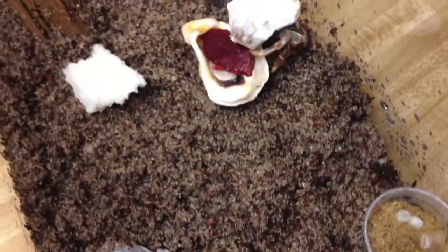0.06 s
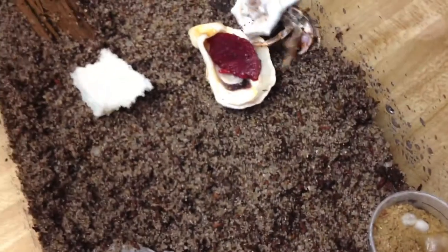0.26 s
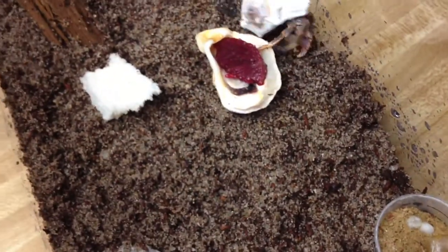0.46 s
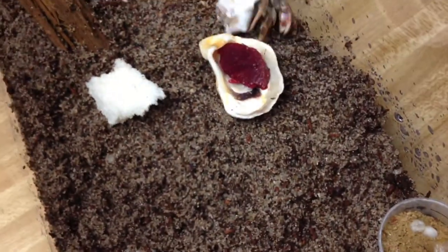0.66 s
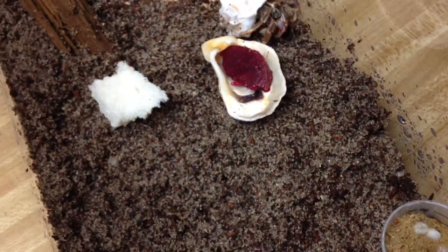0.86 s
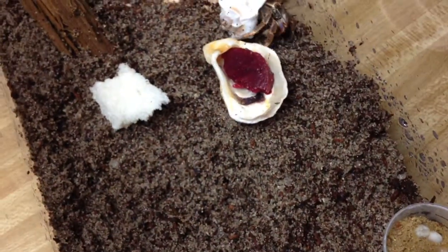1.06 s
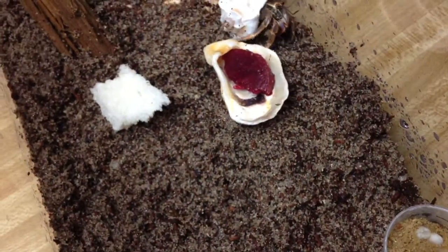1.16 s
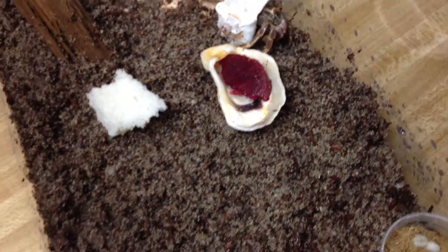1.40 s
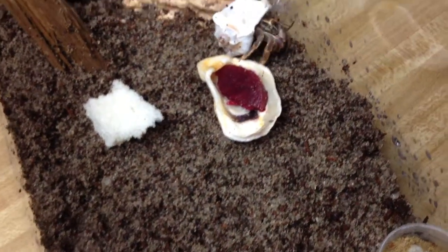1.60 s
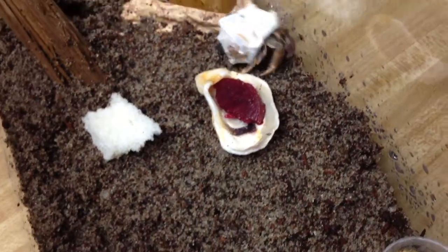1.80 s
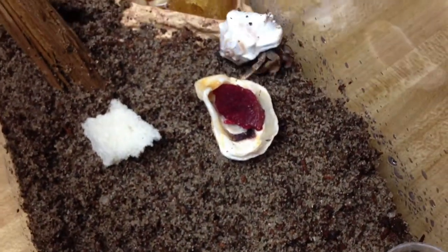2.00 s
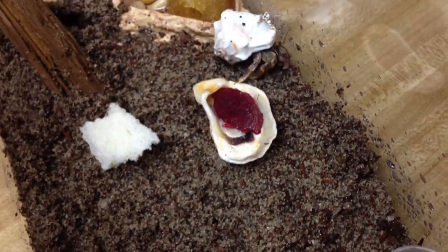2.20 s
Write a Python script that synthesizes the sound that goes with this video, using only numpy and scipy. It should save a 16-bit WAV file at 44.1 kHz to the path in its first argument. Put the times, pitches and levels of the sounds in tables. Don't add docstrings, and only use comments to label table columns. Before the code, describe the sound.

A hermit crab's shell clicks on a small hard dish, then knocks the plastic tank wall; after a quiet gap with tiny ticks and grit scrapes, one last hard knock. Close phone microphone, faint hiss and hum.

```python
import sys
import numpy as np
from scipy import signal
from scipy.fft import rfft, irfft
from scipy.io import wavfile
from scipy.ndimage import uniform_filter1d

SR = 44100
rng = np.random.default_rng(int(sys.argv[2]) if len(sys.argv) > 2 else 0)


def boost(x):
    u = np.asarray(x, float) / 20
    return 10 ** u


def master(y):
    cut = np.clip(np.atleast_2d(y).T, -1, 1)
    pcm = np.round(cut * 32767)
    wavfile.write(sys.argv[1], SR, pcm.astype(np.int16))


N = 99225

# pitch_hz [Hz], level_db [dB per Hz]
NOISE_COLOUR = [(30, -28), (90, -18.5), (150, 4), (250, 13),
                (300, -2.7), (600, -3), (1500, -11), (4000, -15.5), (7000, -17.5), (10000, -23.5),
               (12500, -17.5), (15500, -18.5)]
# pitch_hz [Hz], width_hz [Hz], level_db [dB rms]
DRONE_RESONANCES = [(180, 7.8, -62.5), (236.6, 32, -63), (272, 16, -81.5), (365.2, 79, -69),
                    (466.4, 44, -75.5), (646, 81, -82.5)]
# pitch_hz [Hz], t60_s [s]
TANK_DECAY = [(250, 0.22), (1000, 0.13), (3000, 0.13), (8000, 0.092), (15000, 0.15)]
# start_s [s], length_s [s], level_db [dB rms],
# colour_hz [Hz], spread_oct [octaves], dish_share [0-1, part that rings the dish]
GRIT_SCRAPES = [(.1228, 0.0054, -54.5, 11000, 1, 0), (.128, 0.014, -56, 3930, 1.3, 0),
                (0.141, .012, -66, 3500, 1.1, 0), (0.167, 0.011, -58, 2500, 1.2, 0.26),
                (0.211, 0.014, -62, 10000, 0.53, .9), (0.224, 0.015, -57, 5500, 0.42, .9),
                (0.245, 0.065, -64, 5330, 0.88, 0.84), (0.323, 0.068, -69, 9100, 1, 0.97),
                (0.609, 0.04, -63, 6300, 0.23, 0.68), (0.617, 0.032, -64, 12500, 0.24, 0.64),
                (0.78, 0.026, -80, 7200, 0.18, 1), (0.936, 0.022, -67, 3500, .6, 0.06),
                (1.732, .012, -57, 5700, 0.85, 0), (1.7405, 0.016, -50, 4000, 0.41, 0.6),
                (1.754, 0.024, -60, 3500, 1, 0), (1.827, 0.048, -63.5, 3500, 1.24, 0.02),
                (1.851, 0.03, -51.5, 2200, 0.7, 0.23)]
# start_s [s], peak_db [dB], colour_hz [Hz], spread_oct [octaves]
FAR_WALL_KNOCKS = [
    (1.9478, -21, 1150, 1.5),
]
# pitch_hz [Hz], level_db [dB], t60_s [s]
FAR_WALL_MODES = [(242, -4, 0.018), (445, -3, 0.042), (596, -7, 0.039), (830, 2.8, 0.033),
                  (1100, -8.5, 0.041), (1360, -6, 0.013), (1825, -10.5, 0.031), (2132, -2.5, 0.022),
                  (2810, -9, 0.014), (3530, -13, 0.035), (4300, -23, .022), (5100, -32, 0.01),
                  (7640, -15, .015)]
# start_s [s], peak_db [dB], colour_hz [Hz], spread_oct [octaves]
NEAR_WALL_KNOCKS = [(.4065, -19, 1590, 1.55), (.130, -43.5, 1860, .25), (.151, -46, 2520, 1),
                    (.133, -47.5, 945, .3), (.6012, -50, 1560, 0.62), (.8762, -45, 3150, 0.94),
                    (.8912, -44, 2640, 1.17), (.896, -51, 1100, 0.5), (1.852, -50, 2200, 0.73),
                    (1.8565, -44, 1100, 0.54), (1.8615, -45.5, 1100, 0.23)]
# pitch_hz [Hz], level_db [dB], t60_s [s]
NEAR_WALL_MODES = [(221, 2.5, .08), (300, 3.5, .07), (437, 4.5, 0.054), (630, -2, 0.056), (820, 2, 0.048),
                   (1047.5, -1, 0.044), (1284, -3.5, 0.028), (1800, 0.5, 0.015), (2237, -4, 0.033),
                   (2695, -8, 0.019), (3500, 0, 0.019), (4300, -2, 0.012), (5600, -36, 0.0067),
                   (7200, -12, 0.026)]
# start_s [s], peak_db [dB], colour_hz [Hz], spread_oct [octaves]
DISH_TICKS = [(.1055, -56.5, 11100, 0.11), (.118, -59, 11000, .1), (.2065, -52, 9100, .6),
              (.2135, -49, 3000, 0.77), (.2233, -18.5, 6650, 0.93), (.2275, -32.5, 4840, 0.76),
              (.237, -55, 12000, .2), (.3698, -37, 4300, 0.6), (.381, -42, 4960, 1.1),
              (.3943, -19, 5600, 0.56), (.399, -36, 4200, 0.42), (.592, -58, 9000, .6),
              (.601, -43, 6030, 0.99), (.6305, -50, 11200, 0.41), (.7535, -59, 6000, 0.65),
              (.7715, -47, 7500, 0.65), (1.154, -49, 10700, 0.15), (1.174, -48.5, 11000, 0.3),
              (1.188, -67, 11500, .2)]
# pitch_hz [Hz], level_db [dB], t60_s [s]
DISH_MODES = [(1745, 2, 0.009), (2200, 0.5, 0.0063), (3214, -7.5, 0.0078), (4150, -11.5, 0.015),
              (4600, -7, 0.0054), (5643, -6.7, 0.011), (6440, -1.5, 0.0039), (7200, 1, 0.0047),
              (9140, -27, 0.029), (11100, -13.5, 0.01), (11800, -17, 0.0092), (12240, -12, 0.031),
              (15500, -32, .015)]


def evened(x):
    return x / np.sqrt(np.mean(x ** 2) + 1e-20)


def read_curve(points, hz):
    point_hz, value = np.transpose(points)
    return np.interp(np.log(hz + 1), np.log(point_hz + 1), value)


def add(mix, start_s, sound):
    part = mix[round(start_s * SR):][:len(sound)]
    part += sound[:len(part)]


def highpassed(x, edge_hz):
    return signal.sosfilt(signal.butter(4, edge_hz, "high", fs=SR, output="sos"), x)


def colour_hump(hz, colour_hz, spread_oct):
    octaves = np.log2(np.maximum(hz, 1) / colour_hz)
    return np.exp(-0.5 * (octaves / spread_oct) ** 2)


def tinted(x, colour_hz, spread_oct):
    hz = np.fft.rfftfreq(len(x), 1 / SR)
    return irfft(rfft(x) * colour_hump(hz, colour_hz, spread_oct), len(x))


def ring(modes, colour_hz, spread_oct, split):
    neighbour_db = -8
    t = np.arange(4096) / SR
    hz, level_db, t60_s = np.transpose(modes)[:, :, None]
    sign = (-1.0) ** np.arange(len(modes))[:, None]
    below, above = rng.uniform(0.44, 1, (2, len(modes), 1))
    lower = np.sin(2 * np.pi * hz * (1 - split * below) * t)
    upper = np.sin(2 * np.pi * hz * (1 + split * above) * t)
    cluster = np.sin(2 * np.pi * hz * t) + boost(neighbour_db) * (lower - upper)
    gain = sign * colour_hump(hz, colour_hz, spread_oct)
    return (gain * boost(level_db - 60 * t / t60_s) * cluster).sum(0)


def hits(blows, modes, split, crack_db, crack_t60_s):
    attack_s, bounce_s, bounce_db = 0.00018, 0.0007, -9.5
    out = np.zeros(N)
    t = np.arange(4096) / SR
    for start_s, peak_db, colour_hz, spread_oct in blows:
        body = ring(modes, colour_hz, spread_oct, split)
        crack = evened(tinted(rng.standard_normal(4096), colour_hz, 0.81 * spread_oct))
        crack = crack * boost(crack_db - 60 * t / crack_t60_s)
        blow = boost(peak_db) * (body / np.abs(body).max() + crack) * np.minimum(t / attack_s, 1)
        add(out, start_s, blow)
        add(out, start_s + bounce_s, boost(bounce_db) * blow)
    return out


def hiss():
    level_db, patchy_db = -67.5, 0.5
    hz = np.fft.rfftfreq(1024, 1 / SR)
    real, imag, patches = rng.standard_normal((N // 256 + 5, 513, 3)).T
    patches = uniform_filter1d(uniform_filter1d(patches, 12, 0), 14, 1)
    colour_db = read_curve(NOISE_COLOUR, hz)[:, None]
    spectra = (real + 1j * imag) * boost(colour_db + patchy_db * evened(patches))
    x = signal.istft(spectra, nperseg=1024, noverlap=768)[1][:N]
    return boost(level_db) * x / highpassed(x, 500).std()


def appliance():
    hum_hz, hum_db = 119.8, -76
    t = np.arange(N + SR) / SR
    out = np.sqrt(2) * boost(hum_db) * np.sin(2 * np.pi * hum_hz * t[:N])
    for hz, width_hz, level_db in DRONE_RESONANCES:
        r = np.exp(-np.pi * width_hz / SR)
        real, imag = rng.standard_normal((2, N + SR))
        wander = signal.lfilter([1 - r], [1, -r], real + 1j * imag)
        wander = signal.lfilter([1 - r], [1, -r], wander)
        drone = (wander * np.exp(2j * np.pi * hz * t)).real[SR:]
        out = out + boost(level_db) * evened(drone)
    return out


def tank_reflections(x):
    build_up_s = 0.0032
    hz, t, z = signal.stft(rng.standard_normal(SR // 2), SR, nperseg=128)
    decay = boost(-60 * t / read_curve(TANK_DECAY, hz)[:, None])
    tail = signal.istft(z * decay, SR, nperseg=128)[1]
    tail = tail * np.clip(np.arange(len(tail)) / SR / build_up_s, 0, 1)
    return signal.fftconvolve(x, tail / np.linalg.norm(tail))[:N]


def grit_scrapes():
    grits_per_s, grit_spread_db = 9000, 1.6
    out = np.zeros(N)
    for start_s, length_s, level_db, colour_hz, spread_oct, dish_share in GRIT_SCRAPES:
        chance, side, size = rng.random((4096, 3)).T
        size_db = -grit_spread_db * np.log(size + 0.00093)
        grit = (chance < grits_per_s / SR) * np.sign(side - 0.5) * boost(size_db)
        progress = np.arange(4096) / SR / length_s
        stroke = np.sin(np.pi * np.minimum(progress, 1) ** 0.33)
        dish = ring(DISH_MODES, colour_hz, spread_oct, 0.0083)
        rung = evened(signal.fftconvolve(grit, dish)[:4096])
        bare = evened(tinted(grit, colour_hz, spread_oct))
        add(out, start_s, boost(level_db) * stroke * (dish_share * rung + (1 - dish_share) * bare))
    return out


def wall_knocks():
    wall = dict(split=0.085, crack_db=-8, crack_t60_s=0.012)
    near = hits(NEAR_WALL_KNOCKS, NEAR_WALL_MODES, **wall)
    return near + hits(FAR_WALL_KNOCKS, FAR_WALL_MODES, **wall)


def dish_ticks():
    return hits(DISH_TICKS, DISH_MODES, split=0.022, crack_db=-13.5, crack_t60_s=0.0054)


def scene():
    dish_wet_db, wall_wet_db = -14, -8.5
    dish = dish_ticks() + grit_scrapes()
    wall = wall_knocks()
    reflected = tank_reflections(boost(dish_wet_db) * dish + boost(wall_wet_db) * wall)
    crab = highpassed(dish + wall + reflected, 170)
    return (hiss() + appliance() + crab)[None]


def roll_off(x):
    return signal.sosfilt(signal.butter(12, 15760, fs=SR, output="sos"), x)


def record(dry):
    edge_hz = 15650
    band_limit = signal.firwin(511, edge_hz, window=("kaiser", 9), fs=SR)
    mix = signal.oaconvolve(dry, band_limit[None], "same")
    return roll_off(mix)


dry = scene()
out = record(dry)
master(out)
```